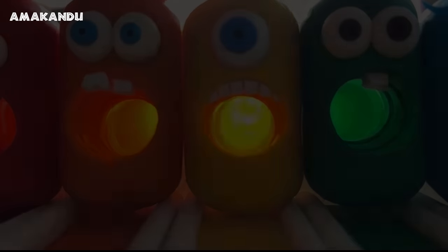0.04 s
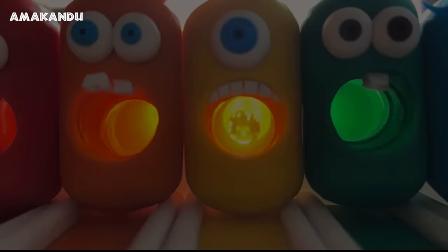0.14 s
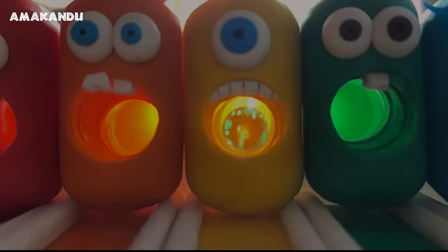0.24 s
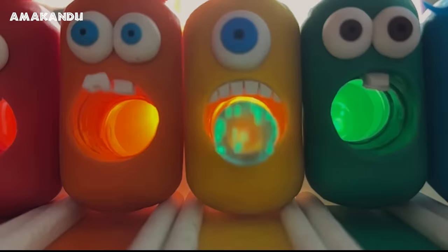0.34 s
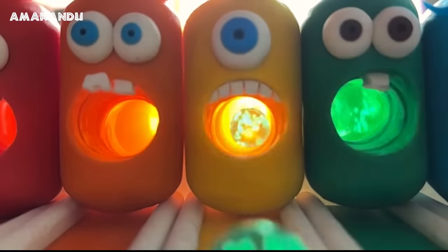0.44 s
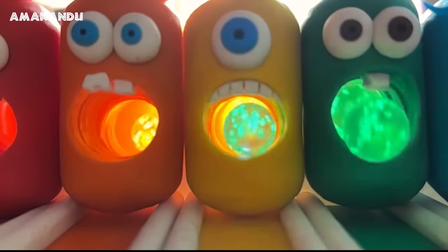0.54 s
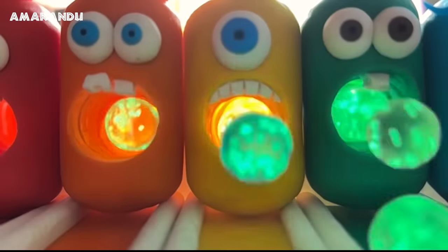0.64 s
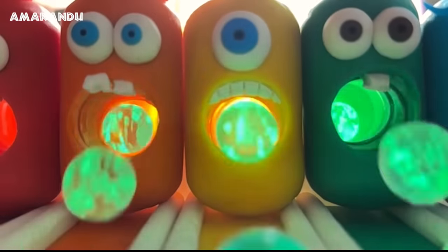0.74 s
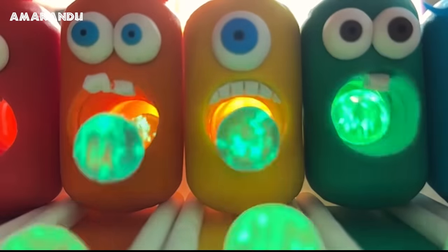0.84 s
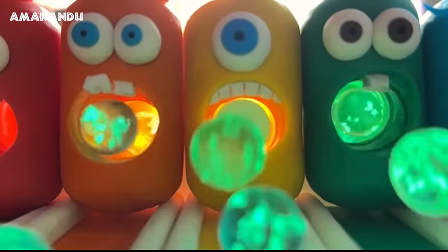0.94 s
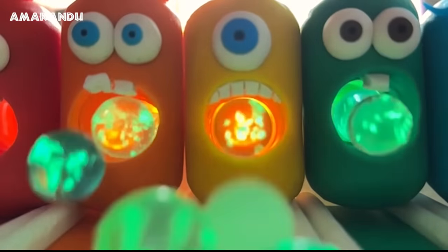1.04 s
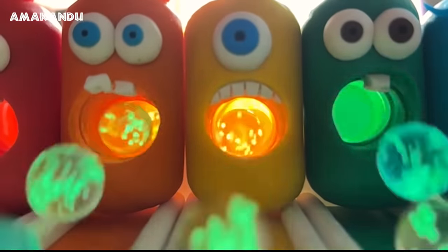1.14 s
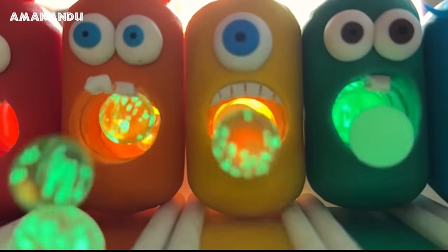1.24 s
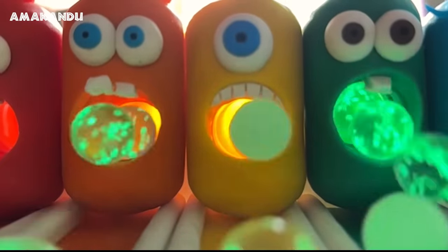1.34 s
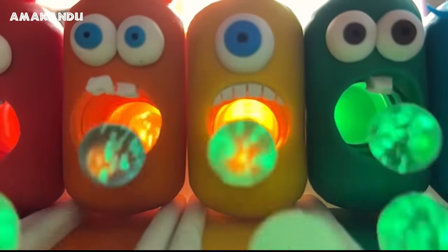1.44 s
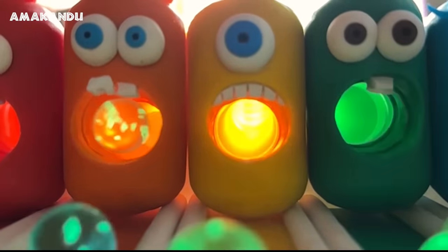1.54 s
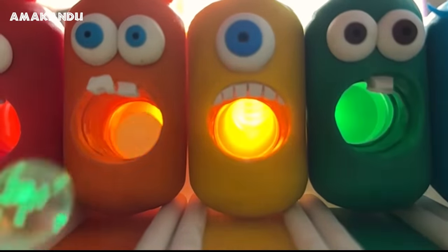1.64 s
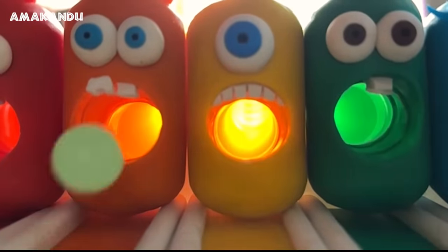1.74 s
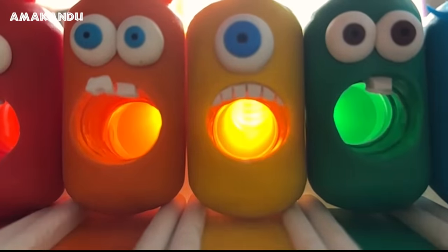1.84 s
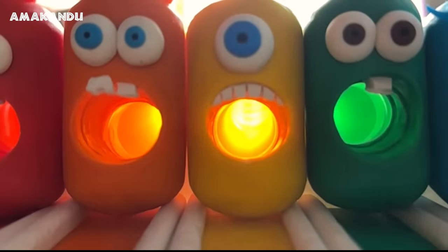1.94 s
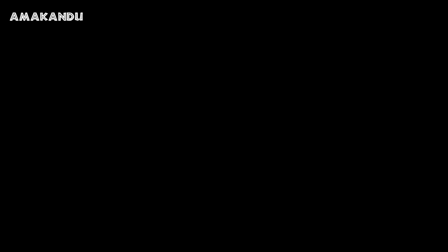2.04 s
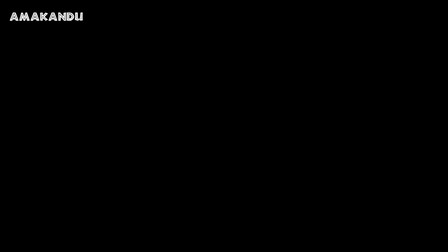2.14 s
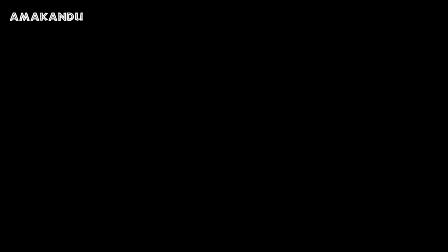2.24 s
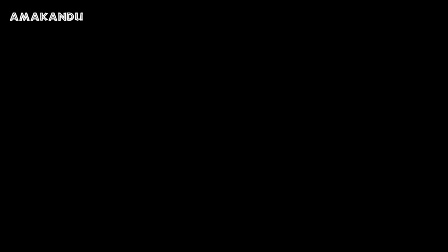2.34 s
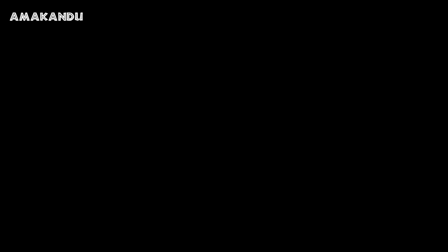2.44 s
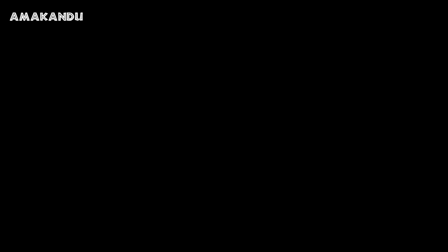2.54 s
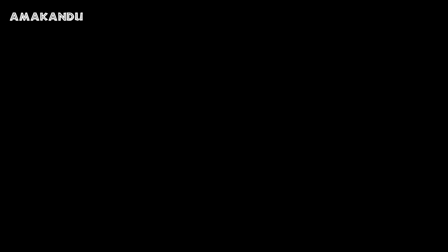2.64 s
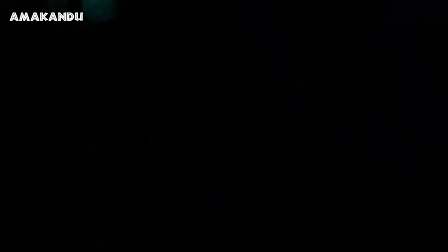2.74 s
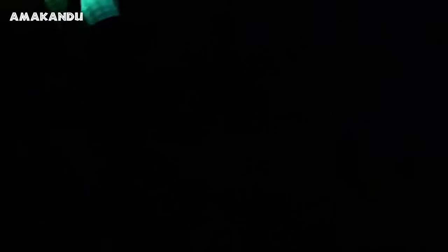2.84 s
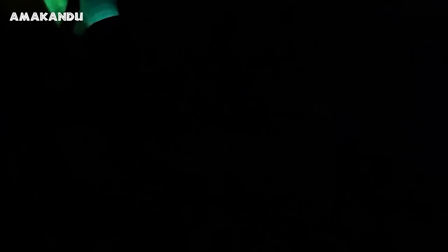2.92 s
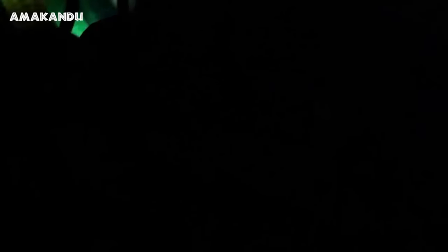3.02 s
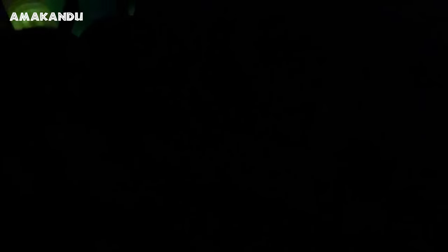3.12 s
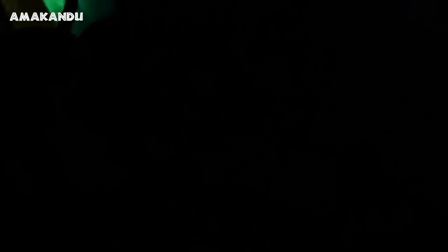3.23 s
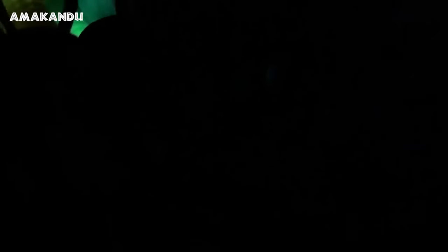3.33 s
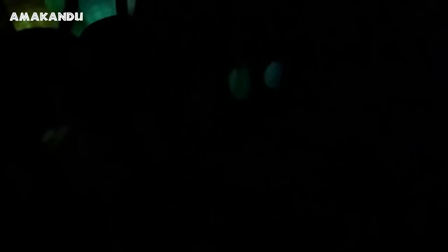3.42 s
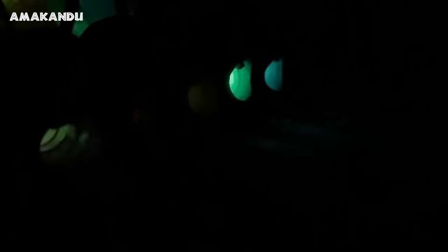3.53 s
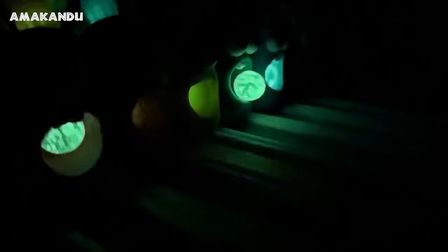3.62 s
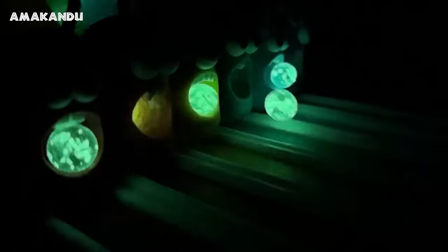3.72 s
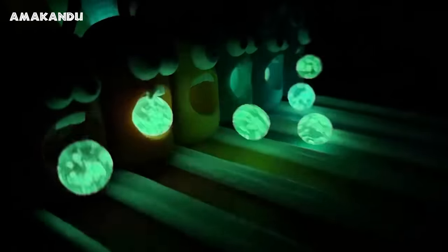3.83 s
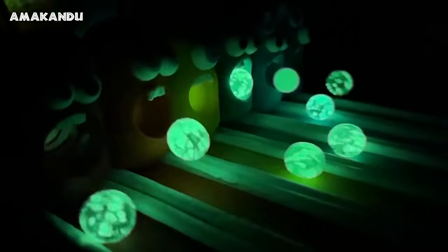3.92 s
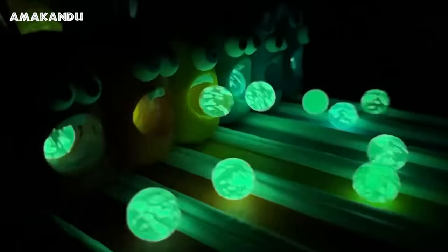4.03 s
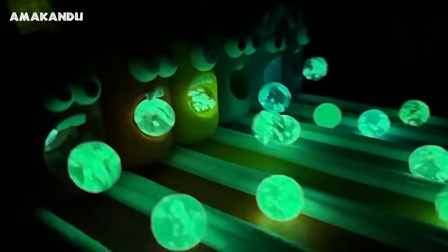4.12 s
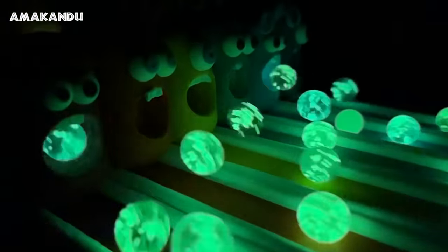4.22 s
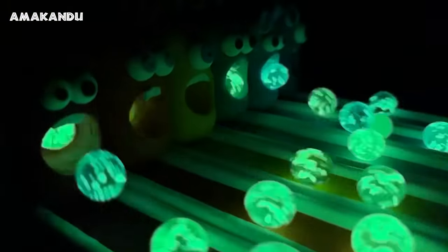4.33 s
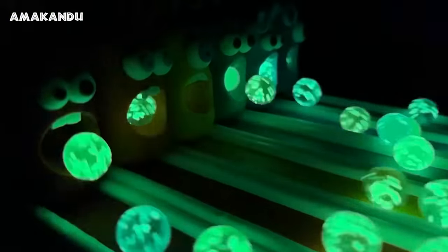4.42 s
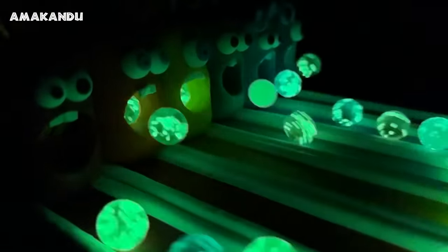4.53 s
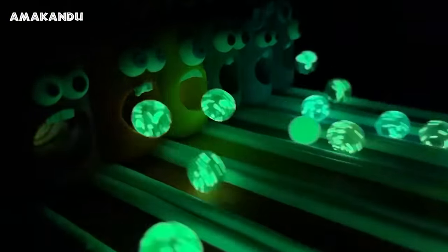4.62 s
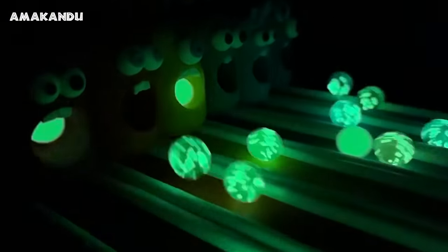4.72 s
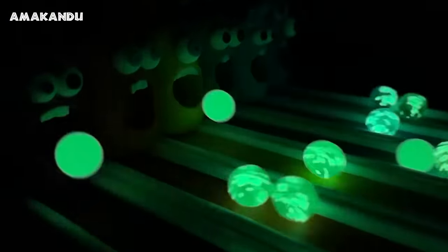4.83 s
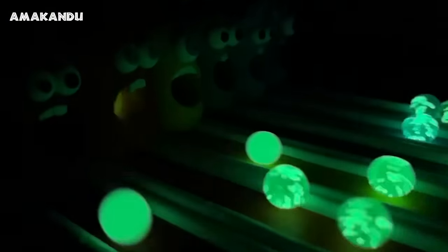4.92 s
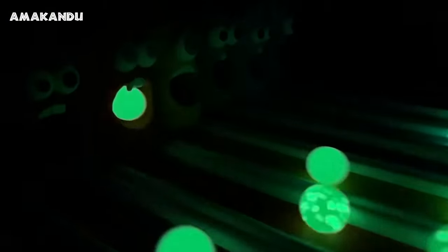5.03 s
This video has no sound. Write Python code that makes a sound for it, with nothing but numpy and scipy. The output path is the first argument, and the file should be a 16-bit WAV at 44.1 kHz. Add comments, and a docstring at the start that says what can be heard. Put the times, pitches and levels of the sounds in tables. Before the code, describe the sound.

Two close rushes of clattering marbles over hollow plastic lanes, split by a near-silent pause with switch clicks and tiny ticks.

```python
"""Marbles on a hollow toy track

Glass marbles roll down the lanes of a hollow toy track in two runs, heard close by; each builds, holds and drains.
Random bumps excite the track's resonances and a grainy hiss; collisions are short falling pips with wall modes.
Drops send dispersed bending waves, skids rasp as filtered bumps, and rocking marbles swell a low lane tone.
In the pause a marble ticks against the gate, and a switch clicks twice in the small room, over faint room tone."""
import sys
import numpy as np
from scipy import signal
from scipy.fft import rfft, irfft, next_fast_len
from scipy.io import wavfile
from scipy.ndimage import uniform_filter1d, minimum_filter1d, map_coordinates

SR = 44100
rng = np.random.default_rng(int(sys.argv[2]) if len(sys.argv) > 2 else 0)


def pcm_store(signal):
    """Save signal as 16-bit PCM."""
    levels = np.round(np.clip(np.atleast_2d(signal), -1, 1) * 32767)
    wavfile.write(sys.argv[1], SR, levels.astype(np.int16).T)


N = 223619
TIME = np.arange(N) / SR
SIZE = next_fast_len(N + SR)
FREQ = np.fft.rfftfreq(SIZE, 1 / SR)

# rumble of the whole track in each run: (frequency [Hz], level [dB])
BODY_1 = [(12, -37), (35, -4.5), (70, -2.5), (120, 1), (178, 4.5), (230, 1), (340, -0.5), (450, -12),
          (650, -13), (1200, -30), (3000, -65.5)]
BODY_2 = [(12, -38.5), (28, -4), (60, -7.5), (100, -2), (145, -5.5), (180, -2), (220, -5), (300, -9),
          (430, -14.5), (700, -31), (2000, -54)]
# resonances of the hollow lanes in each run: (frequency [Hz], width [Hz], level [dB])
LANES_1 = [(268, 17, 3.5), (296, 30, -5), (375, 80, -14), (530, 36, -6), (564, 18, -3), (604, 40, -8),
           (668, 70, -13), (824, 32, -12), (950, 90, -25), (1085, 70, -19.5)]
LANES_2 = [(181, 22, 9.5), (236, 44, -2), (366, 60, 0), (432, 45, -3), (555, 80, -9), (954, 96, -14),
           (1175, 200, -14.5)]
# glass rolling on the lanes' grain in each run: (frequency [Hz], level [dB])
GRAIN_1 = [(500, -31), (1600, 2), (2500, -1), (4000, -0.5), (5400, 1), (6500, 1), (7600, -4.5),
           (9500, -0.5), (11200, -7.5), (12000, -25.5)]
GRAIN_2 = [(500, -12), (1500, -5), (2300, 1.5), (3300, -1.5), (4000, 0), (4900, -15), (6300, -0.5),
           (7200, -25.5), (8300, -51)]


def rolling(layer_db, body, lanes, grain, bump_rate, spread_db, tick_db, ping_db, rush_db, bunch_db, lurch_db,
            sway_s):
    """Random excitation of resonators: bumps shake the track, ring its lanes and tick over a rush of finer grain."""
    rumble_db, drum_db, hiss_db = layer_db
    bunching = amp(bunch_db * wobble(45))  # contacts cluster as marbles catch up with each other
    lurch = lurch_db * wobble(16)  # the track shakes unevenly as single marbles pass
    jolts = bunching * bumps(bump_rate, spread_db)
    rumble = unit(filtered(bumps(bump_rate, spread_db), causal(body)))

    drumming = unit(filtered(jolts, resonances(lanes) * below(1500, order=3)))
    # a varying delay: the resonances waver as the load moves along
    drumming = np.interp(TIME + sway_s * wobble(14), TIME, drumming)

    pings = bunching * jostling(rate=850, life_s=.00048, spread_db=3)
    rush = amp(rush_db) * unit(bumps(12000, 9.7))
    contacts = rush + amp(tick_db) * unit(jolts) + amp(ping_db) * pings
    hiss = unit(filtered(contacts, causal(grain)))
    return amp(rumble_db + lurch) * rumble + amp(drum_db) * drumming + amp(hiss_db) * hiss


def jostling(rate, life_s, spread_db):
    """Superposed transients: countless light touches, each a dry tick of a few cycles at its own pitch."""
    t = np.arange(SR // 60) / SR
    when, pitch, size = rng.random((int(rate * N / SR), 3)).T
    hz = 900 * 5.5 ** pitch[:, None]
    life = life_s * np.sqrt(3000 / hz)  # life_s holds at 3000 Hz; higher ticks die sooner
    envelope = (t / life) * np.exp(-t / life)
    pings = np.sin(2 * np.pi * hz * t) * envelope * np.sqrt(hz)
    pings *= amp(spread_db * np.minimum(-np.log(1 - size), 2))[:, None]
    places = (when * N).astype(int)[:, None] + np.arange(len(t))
    return unit(np.bincount(places.ravel(), pings.ravel(), N)[:N])


# extent of each run: (start [s], end [s])
RUN_1 = (-0.011, 2.101)
RUN_2 = (2.775, 5.1)
# builds as the marbles gather speed, holds, drains as they leave: (full from [s], until [s], drain [dB/s])
FLOW_1 = (0.45, 0.92, 24.9)
FLOW_2 = (3.33, 3.87, 17.7)


def flow(span, full_s, until_s, drain_db_per_s):
    """Source strength over time: the share of build-up still to come (1 to 0), and dB lost as the track empties."""
    building = np.clip((full_s - TIME) / (full_s - span[0]), 0, 1)
    return building, drain_db_per_s * np.maximum(TIME - until_s, 0)


# one row each for rumble, lane drumming and grain hiss:
# (level at full flow [dB], reduction at the start [dB], share of the drain [ratio])
LAYERS_1 = [(-23, 4.5, 0.44), (-18, 3.5, 1.17), (-29.5, 6.5, 1.59)]
LAYERS_2 = [(-22.5, 7.5, 0.46), (-22.5, 8.9, 1.06), (-31, 3.4, 1.4)]


def levels(stream, layers):
    """Level addition in decibels: each rolling layer follows the flow to its own degree."""
    building, drained_db = stream
    return [full_db - start_db * building - share * drained_db for full_db, start_db, share in layers]


# single collisions of marble on marble, loud and soft: (time [s], level [dB], pitch [Hz])
CLACKS = [(.063, -20.5, 2370), (.117, -18.5, 4070), (.149, -14.5, 5730), (.181, -18.5, 2850),
          (.389, -16, 6160), (.553, -16, 1570), (.683, -17.5, 4350), (.76, -16.5, 4300), (.776, -2, 5210),
          (.804, -15.5, 1763), (1.018, -9, 5435), (1.119, -5, 4690), (1.142, -20.5, 1810),
          (1.1895, -14.5, 2285), (1.286, -12.5, 5600), (1.3032, -6, 5100), (1.3938, -19, 4280),
          (1.3988, 0.5, 5510), (1.522, -17, 5970), (1.5349, -16, 5190), (1.572, -14.5, 4580),
          (1.6303, -18.5, 5380), (1.6641, -18, 4820), (1.701, -17.5, 5540), (1.765, -28, 1700),
          (1.8097, -17, 5430), (1.8214, -7, 4990), (2.004, -22.5, 4920), (2.01, -15, 5290),
          (3.038, -19.5, 2630), (3.178, -16, 3890), (3.1838, -7.5, 3780), (3.277, -22.5, 2460),
          (3.5403, -13.5, 3010), (3.9376, -11, 3890), (4.0482, -15.5, 2910), (4.1953, -10.5, 3890),
          (4.208, -18, 3530), (4.2365, -3.5, 6100), (4.2657, 1.5, 3535), (4.2863, -16.5, 2780),
          (4.467, -18, 3210), (4.543, -18, 3470), (4.568, -3, 3950), (4.614, -14.5, 2750),
          (4.6204, -8, 3455), (4.7063, -20, 2410), (4.7495, -17.5, 2990), (4.7932, -4, 3722),
          (4.8106, -18, 3000), (4.8577, -11.5, 2870), (4.958, -25.5, 2780), (5.003, -28, 3634)]
# spectrum of a clack's contact noise: (frequency [Hz], level [dB])
SNAP = [(600, -10), (1500, -0.5), (3500, 11), (6000, 9.5), (10000, -2.5), (13000, -13.5)]
# modes that a clack rings in the lane's wall: (frequency [Hz], level [dB])
WALL = [(1250, -9.5), (1850, -5.5), (2400, -5.5), (2850, -6), (3780, 3.5)]
CLACK_CYCLES, TICK_CYCLES = 8.17, 2.6  # nominal length of a hard clack and a light one, in cycles of its pitch
DAMPED_HZ = 3400  # duller clacks than this last no longer: the plastic damps them


def clacks(rows, cycles, rise, fall, droop, snap_db, wall_db, wall_s, ring_db, ring_t60):
    """Impact radiation: colliding glass gives a short falling pip, a knock in the lane's wall and a brief rattle."""
    lead = SR // 200  # samples before the blow, for the swell
    out, t = np.zeros(N), np.arange(-lead, SR // 25) / SR
    after = np.maximum(t, 0)
    snaps = unit(filtered(rng.standard_normal(N), amp(along(SNAP, FREQ))))
    for s, db, hz in rows:
        length = cycles / max(hz, DAMPED_HZ)
        snap = np.roll(snaps, rng.integers(N))[:len(t)]
        pitch = hz * (1 - droop * np.tanh(2 * t / length))
        pip = np.sin(2 * np.pi * (np.cumsum(pitch) / SR + rng.random()))

        swell = (1 + np.tanh(t / (rise * length) + 1)) / 2
        burst = swell * np.exp(-after / (fall * length))
        knock = swell * amp(wall_db) * np.exp(-after / wall_s)
        ring = swell * amp(ring_db - 60 * t / ring_t60)

        wall = np.zeros(len(t))
        for mode_hz, mode_db in WALL:  # every blow excites the modes a little differently
            gain = amp(mode_db + rng.normal(0, 2))
            cycle = mode_hz * rng.normal(1, .06) * t + rng.random()
            wall += gain * np.sin(2 * np.pi * cycle)
        sound = burst * (pip + amp(snap_db) * snap) + knock * wall + ring * (0.18 * wall + snap)
        add(out, s - lead / SR, amp(db) * sound)
    return out


def light_clacks(contacts, low_hz, high_hz):
    """Random pitch on a log scale: glancing collisions as rows (time [s], level [dB], pitch [Hz])."""
    s, db = contacts
    return list(zip(s, db, low_hz * (high_hz / low_hz) ** rng.random(len(s))))


# single drops of a marble on a lane, heavy and light: (time [s], relative level [dB], relative crack level [dB])
KNOCKS = [(0.124, -7.5, -5), (.287, -6.5, -18.5), (.322, -5, -16), (.456, -7.5, -18), (.508, -2.5, -10.5),
          (.552, -5, -13), (.59, -6, -4), (.696, -2.5, -19), (.753, -5.5, -15), (.803, -5.5, -12),
          (.846, 3, -14.5), (.933, -5, -17.5), (.968, -7.5, -7.5), (1.065, -3.5, -11), (1.14, 0.5, -9),
          (1.185, -5, -6), (1.241, -6.5, -8.5), (1.284, -19.5, -14), (1.324, -5, -10), (1.368, -8.5, -26),
          (1.444, -5.5, -11.5), (1.502, -7, -16), (1.562, -5, -14.5), (1.574, -8.5, -17.5),
          (1.711, -4, -15.5), (1.767, -23.5, -6.5), (1.852, -13, -6), (2.01, -12, -5.5), (2.965, -10, -19),
          (3.182, -6.5, -1.5), (3.205, -2.5, -10), (3.255, -9, -7.5), (3.444, -5.5, -8.5),
          (3.497, -6, -6.5), (3.538, -12, 3.5), (3.583, -9.5, -2.5), (3.621, -2.5, -13), (3.911, -7, -13),
          (3.934, -4.5, -4.5), (3.975, -6, -7.5), (4.133, -7, -10), (4.176, -5.5, -8), (4.237, -11.5, -7),
          (4.341, -13.5, -8), (4.449, -10.5, -29), (4.569, -5.5, -11.5), (4.619, -13.5, -9),
          (4.665, -6.5, -10.5), (4.807, -14.5, -9), (4.979, -11.5, -11.5)]
# response of a lane under a drop: (frequency [Hz], level [dB])
THUD = [(15, -29.5), (40, -0.5), (150, 0.5), (350, 6.5), (650, -2), (1200, -14.5), (4000, -50)]
# the drop's hard contact: (frequency [Hz], level [dB])
CRACK = [(300, -24.5), (700, -2), (1200, 9), (2500, 2), (5000, -4.5), (10000, -28.5)]
# the toy's shell ringing on after a drop: (frequency [Hz], width [Hz], level [dB])
BOOM = [(178, 24, -1.5), (358, 250, -12.5), (526, 54, -15.5)]


def knocks(rows, lag_s, ring_db, ring_t60, crack_db, boom_db):
    """Bending-wave dispersion: a drop's treble arrives first and its bass last, and the shell booms on."""
    thuds, cracks, t = np.zeros(N), np.zeros(N), np.arange(SR // 8) / SR
    for s, db, hardness_db in rows:
        blow = rng.standard_normal(len(t)) * amp(-60 * t / ring_t60)
        blow *= amp(ring_db) / np.linalg.norm(blow)
        blow[0] += 1
        add(thuds, s, amp(db) * blow)
        add(cracks, s, amp(db + hardness_db + crack_db) * blow)
    travel = np.exp(-4j * np.pi * lag_s * np.sqrt(250 * FREQ))  # the delay is lag_s at 250 Hz
    responses = travel * [causal(THUD), resonances(BOOM), causal(CRACK)]
    lane, shell, contact = [r / np.abs(irfft(r)).max() for r in responses]
    return filtered(thuds, lane + amp(boom_db) * shell) + filtered(cracks, contact)


def light_knocks(contacts, crack_db, vary_db):
    """Random contact hardness: small hops as rows (time [s], relative level [dB], relative crack level [dB])."""
    s, db = contacts
    return list(zip(s, db, crack_db + vary_db * rng.uniform(-1.1, 1, len(s))))


def scattered(span, stream, level_db, spread_db, share, count):
    """Stratified random timing: one light contact in each equal slice of a run, fading as it drains."""
    when, size = rng.random((count, 2)).T
    s = span[0] + (span[1] - span[0]) * (np.arange(count) + when) / count
    return s, level_db - spread_db * size - share * np.interp(s, TIME, stream[1])


# a landed marble skids along its lane: (time [s], length [s], level [dB])
SKIDS = [(1.067, 0.016, -34), (1.132, 0.011, -28.5), (1.182, 0.015, -29), (1.238, 0.033, -31.5),
         (1.283, 0.012, -27.5), (1.324, 0.028, -33), (1.443, .014, -34), (3.918, .016, -22.5),
         (4.171, 0.014, -21.5)]


def skids(edge_s, rate, spread_db, top_hz):
    """Sliding friction: glass rasps over the lane's grain for a moment before it rolls again."""
    def ramp(s):
        return (1 + np.tanh((TIME - s) / edge_s)) / 2

    pressure = sum(amp(db) * ramp(s) * (1 - ramp(s + length)) for s, length, db in SKIDS)
    rasp = filtered(bumps(rate, spread_db), causal(GRAIN_1) * below(top_hz, order=1))
    return pressure * unit(rasp)


# a marble rocking in its lane: (time of the height [s], level [dB], pitch [Hz], rise [s])
THUMPS = [(.14, -13.5, 274.7, .02), (0.481, -11.5, 271, 0.0184), (.565, -12, 275, 0.016),
          (.745, -14, 256.6, .012), (.78, -11.5, 249, .012), (.822, -16.5, 267.5, .012),
          (.935, -11.5, 267.5, .016), (.997, -16, 273, .012), (1.145, -16, 174.6, .016),
          (1.201, -14, 265.5, .015), (1.25, -19, 382.6, .015), (1.376, -20.5, 191, 0.0064),
          (1.44, -18.5, 188.3, .015), (1.503, -19, 209.4, .015), (1.57, -15.5, 181.4, .022),
          (1.727, -19.5, 102, 0.01), (1.872, -32.5, 165.5, .025), (2.033, -35.5, 80.7, 0.036),
          (2.975, -16, 183, .03), (3.04, -18, 195, 0.011), (3.205, -14.5, 172, .02),
          (3.285, -13.5, 185.4, .02), (3.401, -21.5, 359, .02), (3.626, -15, 179.5, .012),
          (3.686, -15, 200.4, 0.011), (3.759, -15, 181.6, .018), (3.85, -16.5, 178, .022),
          (3.944, -5.5, 180.7, 0.012), (4.021, -16.5, 184.5, .022), (4.058, -22, 100, 0.015),
          (4.162, -17, 139.5, 0.011), (4.188, -16, 399, .014), (4.247, -22, 202, 0.0166),
          (4.305, -20.5, 185, 0.016), (4.442, -21.5, 182, .022), (4.589, -19, 130, 0.013),
          (4.662, -22, 153.5, 0.015), (4.687, -25.5, 342, 0.0127), (4.786, -19.5, 139.6, 0.018),
          (4.982, -20.5, 168, .015)]
# the wall's chatter under a rocking marble: (frequency [Hz], level [dB])
WOOD = [(100, -22), (250, 3), (400, 6.5), (600, -6.5), (900, -10), (2000, -17.5), (5000, -29), (12000, -55)]


def thumps(wander, wood_db):
    """Resonance pumping: a rocking marble swells a lane tone, makes the wall chatter and dies away."""
    boom, rocking, t = np.zeros(N), np.zeros(N), np.arange(SR // 5) / SR
    for s, db, hz, rise_s in THUMPS:
        swell = amp(db) * (t / rise_s * np.exp(1 - t / rise_s)) ** 2
        drift = wander * np.cumsum(rng.standard_normal(len(t)))
        phase = 2 * np.pi * (hz * t + rng.random()) + drift
        add(boom, s - rise_s, swell * np.sin(phase))
        add(rocking, s - rise_s, swell)
    chatter = unit(filtered(bumps(700, 6), causal(WOOD)))
    return boom + amp(wood_db) * rocking * chatter


# a waiting marble ticks against the gate: (time [s], relative level [dB])
SHIFTS = [(2.492, -33), (2.502, -32), (2.512, -24.5)]
# spectrum of those ticks: (frequency [Hz], level [dB])
GATE = [(200, -18), (500, -3), (800, -9.5), (1300, -16), (2000, -11.5), (2800, -2), (3500, 4.5), (5000, -3),
        (8000, -31)]
# the gate's resonances: (frequency [Hz], width [Hz], level [dB])
GATE_RING = [(2750, 97, 0), (3100, 90, 1), (3480, 99, 1.5), (4300, 300, -6.5)]
# reverberation of the small room, shared with the switch: (frequency [Hz], t60 [s])
ROOM = [(200, 0.47), (1000, 0.67), (4000, 0.67), (8000, 0.56), (15000, 1)]


def waiting(ring_db, room_db):
    """Modal response to impact: a marble settles against the gate with three dry ticks."""
    ticks, t = np.zeros(N), np.arange(SR // 15) / SR
    for s, db in SHIFTS:
        strike = amp(-60 * t / .004) + amp(-9 - 60 * t / .04)  # a sharp and a slower decay
        add(ticks, s, amp(db) * strike * rng.standard_normal(len(t)))
    ticks = filtered(ticks, causal(GATE) + amp(ring_db) * resonances(GATE_RING))
    return ticks + amp(room_db) * echoes(ticks, ROOM)


# the two clicks of the switch: (time [s], relative level [dB])
SWITCH = [(2.256, -23.5), (2.369, -17.5)]
# spectrum of the switch's casing: (frequency [Hz], level [dB])
CASING = [(100, -13.5), (250, -11.5), (500, -9), (800, -2.5), (1200, -10.5), (2000, -4), (5000, -3.5),
          (8000, -9), (15000, -25)]
# resonances of the casing: (frequency [Hz], width [Hz], level [dB])
CASING_RING = [(242, 8.6, -2), (504, 29, 1.5), (836, 60, 6), (1370, 47, 1.5), (2700, 40, -4),
               (3080, 45, 4.5), (3480, 80, -4), (5090, 180, 2), (5470, 210, -6)]


def switch(click_t60, click_db, ring_db, room_db):
    """Modal ringing and reverberation: two sharp clicks ring a small casing, and the room adds a smooth wash."""
    clicks, wash, t = np.zeros(N), np.zeros((2, N)), np.arange(SR // 10) / SR
    for s, db in SWITCH:
        snap = amp(-60 * t / click_t60) + amp(-60 * t / 0.0025)
        click = amp(db + click_db) * snap * rng.standard_normal(len(t))
        add(clicks, s, click)
        pulse = np.zeros(N)
        pulse[round(s * SR)] = np.linalg.norm(click)
        wash += echoes(pulse, ROOM)
    wash = wash[0] + 0.53 * wash[1] * np.array([[1], [-1]])  # middle plus a narrower side signal
    casing = causal(CASING) + amp(ring_db) * resonances(CASING_RING)
    return filtered(clicks + amp(room_db) * wash, casing)


def steady_hiss(shape, level_db, edge_hz):
    """Low-passed stationary noise: a dull, even background hiss lies under each run."""
    hiss = filtered(rng.standard_normal(N), causal(shape) * below(edge_hz, order=8))
    return amp(level_db) * unit(hiss)


# spectrum of the quiet room: (frequency [Hz], level [dB])
HUSH = [(15, -34.5), (25, -19.5), (59, 5.5), (225, 0), (3660, -31), (7740, -38), (9760, -37.5),
        (12000, -45.5), (15600, -74), (22000, -120)]
# a soft brush before the release: (time [s], level [dB])
RUSTLE = [(2.67, -82), (2.71, -51.5), (2.735, -49), (2.775, -53.5), (2.8, -80.5)]


def background(hush_db):
    """Partly correlated noise: room tone, and a soft brushing just before the second run."""
    hush = unit(filtered(rng.standard_normal((2, N)), amp(along(HUSH, FREQ))))
    brush_shape = [(100, 5.5), (800, 0.0), (3500, -2.0), (10000, -19.5), (15000, -25.0)]  # (Hz, dB)
    brush = unit(filtered(bumps(2200, 2.9), causal(brush_shape)))
    return amp(hush_db) * (hush[0] + 0.12 * hush) + amp(curves(RUSTLE)[0]) * brush


# phase between the two microphone ports at each listening place: (frequency [Hz], phase [rad])
PORTS_1 = [(0, 0.0), (550, 0.36), (1300, 0.0), (2300, -0.53), (3500, 0.06), (4300, -0.11), (4950, 0.45),
           (5400, 2.61), (5900, 3.2), (7400, 6.24), (9000, 9.41), (11500, 14.51)]
PORTS_2 = [(0, 0.0), (450, 0.61), (850, 0.03), (1500, 0.63), (2400, -0.0), (2900, 1.24), (3280, 3.0),
           (3450, 3.0), (3700, 1.54), (4200, 0.75), (5200, -0.24), (6100, -1.88), (6900, -3.13),
           (7600, -3.5)]
# left minus right at each listening place: (frequency [Hz], level difference [dB])
TILT_1 = [(60, -4.5), (130, -4.5), (270, -3), (570, -3.5), (1000, 0)]
TILT_2 = [(30, -4.5), (70, -5), (270, 5), (570, 1.5), (1200, .5), (10000, -0.5)]
# decay of reflections within the toy: (frequency [Hz], t60 [s])
SHELL = [(50, 0.23), (300, 0.082), (1500, 0.064), (5000, 0.027), (12000, 0.028)]
# level of those reflections: (frequency [Hz], level [dB])
SPREAD = [(40, -14.5), (150, -17), (300, -11.5), (600, -10.5), (1200, -15), (3400, -17.5), (10000, -17)]
EDGE_1_HZ, EDGE_2_HZ = 11700, 8300  # upper band edge at each listening place


def heard(x, ports, tilt, edge_hz):
    """Interchannel phase and level difference: two ports receive the track with the toy's own reflections."""
    turn = np.interp(FREQ, *np.transpose(ports))
    sides = np.array([[1], [-1]]) / 2
    direct = filtered(x, np.exp(1j * sides * turn) * amp(sides * along(tilt, FREQ)))
    reflected = filtered(echoes(x, SHELL), amp(along(SPREAD, FREQ)))
    return filtered(direct + reflected, below(edge_hz, order=40))


def echoes(x, decay):
    """Diffuse reverberation: noise tails at both ports, where each frequency dies at its own speed."""
    hz, t, z = signal.stft(rng.standard_normal((2, SR // 2)), SR, nperseg=256)
    fading = amp(-60 * t / along(decay, hz)[:, None])
    tail = signal.istft(z * fading, SR, nperseg=256)[1]
    return signal.fftconvolve(x[None], tail / np.linalg.norm(tail[0]), axes=1)[:, :N]


def bumps(rate, spread_db):
    """Random impulse process: tiny impacts, rate a second, of unequal size and either sign."""
    hit = rng.random(N) < rate / SR
    return hit * rng.choice([-1, 1], N) * amp(spread_db * np.clip(rng.standard_normal(N), -2, 2))


def wobble(rate):
    """Spline interpolation: a smooth random curve with rate knots a second."""
    return map_coordinates(rng.standard_normal(int(N * rate / SR) + 4), [TIME * rate])


def resonances(modes):
    """Modal superposition: causal band-pass responses of (Hz, width Hz, dB) rows with alternating sign."""
    total = 0
    for k, (centre, width, db) in enumerate(modes):
        damping = 1j * FREQ * width
        total = total + (-1) ** k * amp(db) * damping / (centre ** 2 - FREQ ** 2 + damping)
    return total


def causal(points):
    """Minimum phase: a response with the given (Hz, dB) shape rings after a blow, not before."""
    cepstrum = irfft(np.log(amp(along(points, FREQ))), SIZE)
    cepstrum[1:SIZE // 2] *= 2
    cepstrum[SIZE // 2 + 1:] = 0
    return np.exp(rfft(cepstrum))


def below(edge_hz, order):
    """Butterworth magnitude: low-pass gain on the frequency grid."""
    return 1 / np.sqrt(1 + (FREQ / edge_hz) ** (2 * order))


def filtered(x, response):
    """Convolution theorem: the spectrum of x times a response on the frequency grid."""
    return irfft(rfft(x, SIZE) * response, SIZE)[..., :N]


def along(points, hz):
    """Logarithmic frequency axis: (Hz, value) points interpolated at hz."""
    f, v = np.transpose(points)
    return np.interp(np.log(hz + 1), np.log(f + 1), v)


def curves(rows):
    """Linear interpolation: one value per sample for each column after the time."""
    s, *cols = np.transpose(rows)
    return [np.interp(TIME, s, c) for c in cols]


def during(span):
    """Gating: 1 inside the span and 0 outside, with abrupt ends."""
    return uniform_filter1d(1. * ((TIME > span[0]) & (TIME < span[1])), size=64)


def add(track, s, sound):
    """Superposition: mix a short sound into the track at time s."""
    start = max(round(s * SR), 0)
    track[start:start + len(sound)] += sound[:max(N - start, 0)]


def amp(db):
    """Level to amplitude ratio: 20 dB is a factor of ten."""
    return 10 ** (np.asarray(db) / 20)


def unit(x):
    """Normalisation by effective value: x scaled to rms 1."""
    return x / np.sqrt(np.mean(x ** 2) + 1e-20)


# how clacks and drops are coloured on their way to the second listening place: (frequency [Hz], level [dB])
CLACK_COLOUR_2 = [(1100, 2), (1800, -1.5), (2700, 1), (4000, -0.5), (5300, -13.5), (7000, -5.5),
                  (8500, -21)]
DROP_COLOUR_2 = [(70, 1), (180, 1), (540, 2), (730, -8.5), (1050, 3), (4000, 1)]


def scene():
    """Superposition of sources: two runs of marbles with the quiet pause between them."""
    stream_1, stream_2 = flow(RUN_1, *FLOW_1), flow(RUN_2, *FLOW_2)
    touches_1 = scattered(RUN_1, stream_1, level_db=-20, spread_db=7.5, share=0.72, count=72)
    ticks_1 = light_clacks(touches_1, low_hz=1982, high_hz=6986)
    touches_2 = scattered(RUN_2, stream_2, level_db=-21, spread_db=5.5, share=0.38, count=72)
    ticks_2 = light_clacks(touches_2, low_hz=1727, high_hz=4400)
    landings_1 = scattered(RUN_1, stream_1, level_db=-10.5, spread_db=1.5, share=0.98, count=34)
    hops_1 = light_knocks(landings_1, crack_db=-14.5, vary_db=10.5)
    landings_2 = scattered(RUN_2, stream_2, level_db=-10.5, spread_db=10.5, share=0.66, count=38)
    hops_2 = light_knocks(landings_2, crack_db=-6.0, vary_db=9)

    hard = clacks(CLACKS, CLACK_CYCLES, rise=0.48, fall=0.33, droop=.08, snap_db=-7.0,
                  wall_db=-16.5, wall_s=0.00086, ring_db=-27.5, ring_t60=0.047)
    light = clacks(ticks_1 + ticks_2, TICK_CYCLES, rise=0.7, fall=0.54, droop=0.18, snap_db=-0.5,
                   wall_db=-13, wall_s=.001, ring_db=-20.5, ring_t60=0.024)
    glass = hard + light + skids(edge_s=0.0026, rate=3500, spread_db=9.5, top_hz=6510)
    drops = amp(-8.5) * knocks(KNOCKS + hops_1 + hops_2, lag_s=0.003118, ring_db=-0.5, ring_t60=0.047,
                               crack_db=3.0, boom_db=-16)
    drops = drops + thumps(wander=.016, wood_db=-15)

    roll_1 = rolling(levels(stream_1, LAYERS_1), BODY_1, LANES_1, GRAIN_1, bump_rate=650, spread_db=3.5,
                     tick_db=3, ping_db=-2.5, rush_db=-1.0, bunch_db=1.6, lurch_db=1.5, sway_s=0.00033)
    roll_2 = rolling(levels(stream_2, LAYERS_2), BODY_2, LANES_2, GRAIN_2, bump_rate=600, spread_db=4.0,
                     tick_db=3.5, ping_db=-2.0, rush_db=-0.5, bunch_db=2.0, lurch_db=1, sway_s=0.0007)
    hiss_1 = steady_hiss(GRAIN_1, level_db=-54, edge_hz=5500)
    hiss_2 = steady_hiss(GRAIN_2, level_db=-52.5, edge_hz=4020)

    first = during(RUN_1) * heard(roll_1 + hiss_1 + glass + drops, PORTS_1, TILT_1, EDGE_1_HZ)
    coloured = filtered(glass, amp(along(CLACK_COLOUR_2, FREQ))) + filtered(drops, causal(DROP_COLOUR_2))
    second = during(RUN_2) * heard(roll_2 + hiss_2 + coloured, PORTS_2, TILT_2, EDGE_2_HZ)
    gate = waiting(ring_db=11.5, room_db=-15.5)
    clicks = switch(click_t60=0.047, click_db=-5.5, ring_db=2.0, room_db=-1.5)
    return first + second + gate + clicks + background(hush_db=-66.5)


LIMITER_S, TOP_HZ = .004, 16000  # limiter window and upper band limit


def record(dry):
    """Peak limiting and band limiting: ducks peaks that would pass full scale and removes all from TOP_HZ up."""
    size = int(LIMITER_S * SR)
    needed = 1 / np.maximum(np.abs(dry).max(axis=0), 1)
    gain = uniform_filter1d(minimum_filter1d(needed, size), size)
    return filtered(dry * gain, FREQ < TOP_HZ)


dry = scene()
out = record(dry)
pcm_store(out)
```